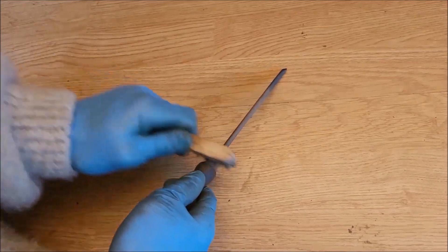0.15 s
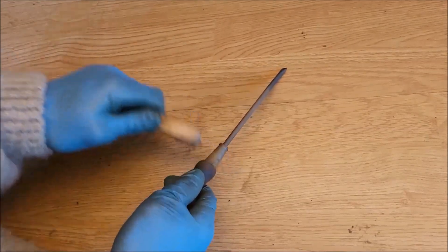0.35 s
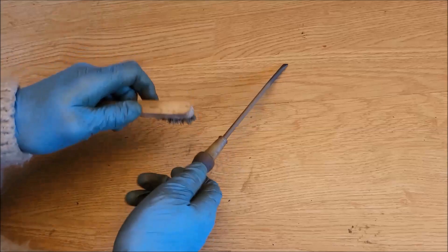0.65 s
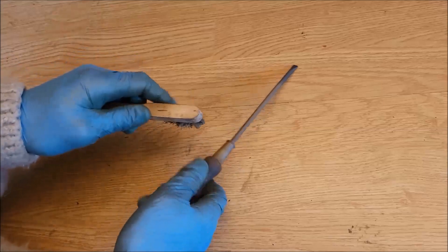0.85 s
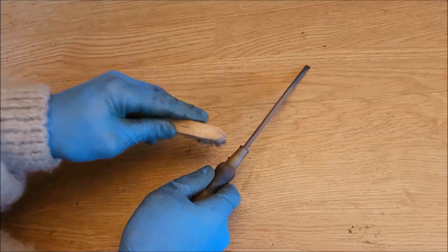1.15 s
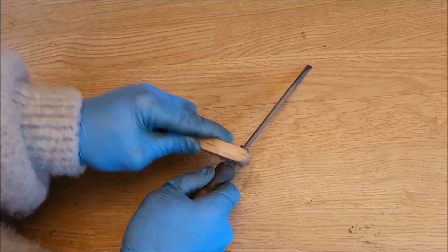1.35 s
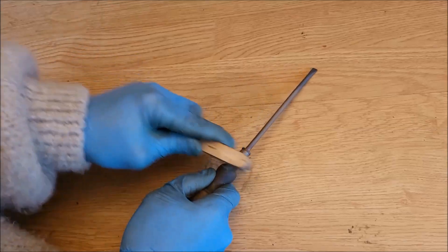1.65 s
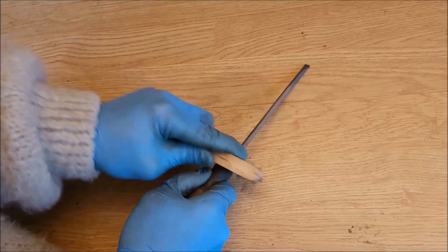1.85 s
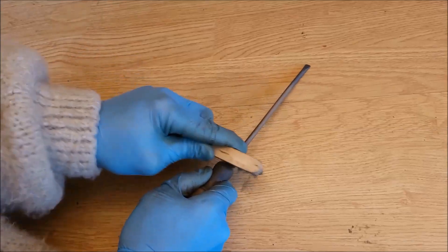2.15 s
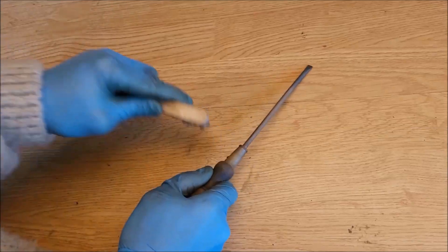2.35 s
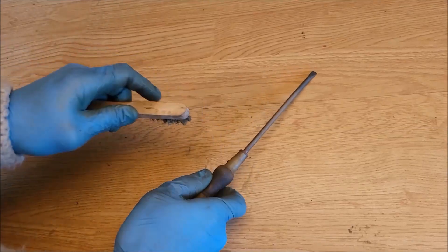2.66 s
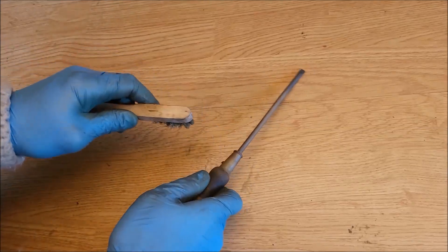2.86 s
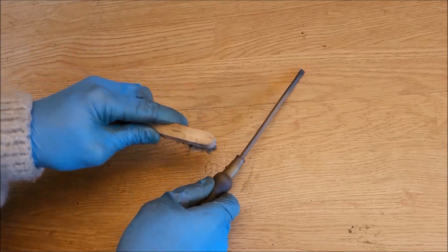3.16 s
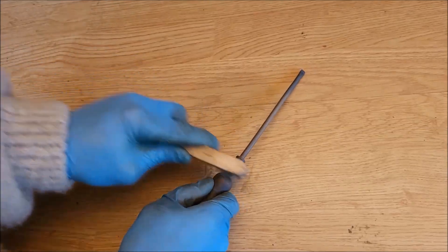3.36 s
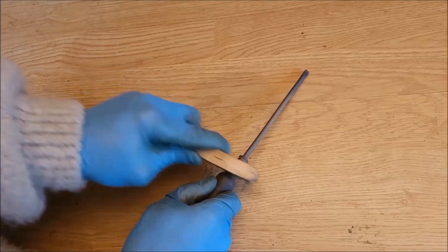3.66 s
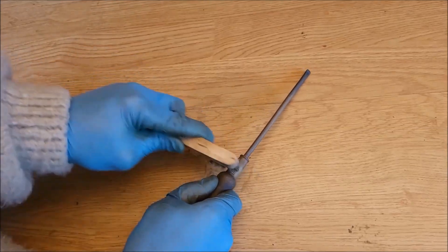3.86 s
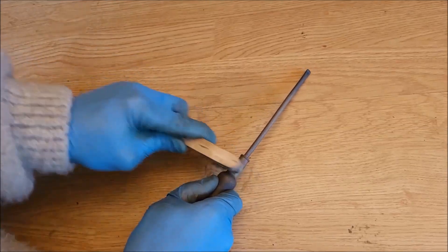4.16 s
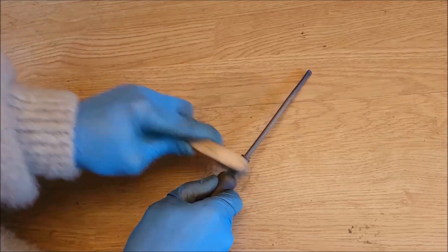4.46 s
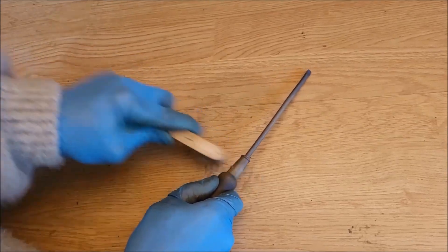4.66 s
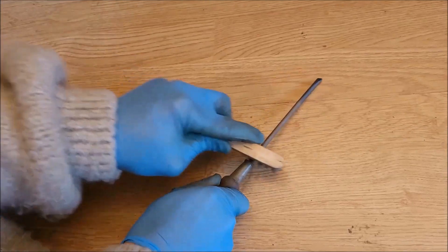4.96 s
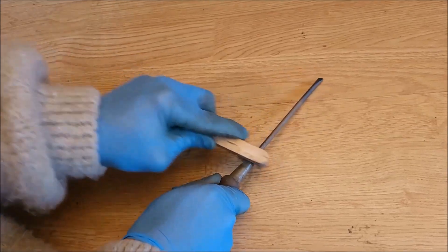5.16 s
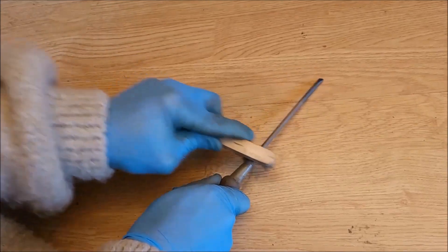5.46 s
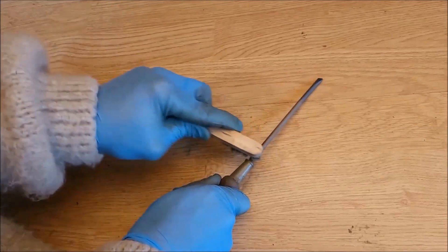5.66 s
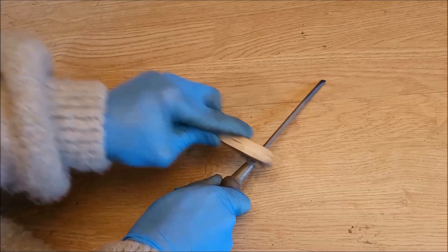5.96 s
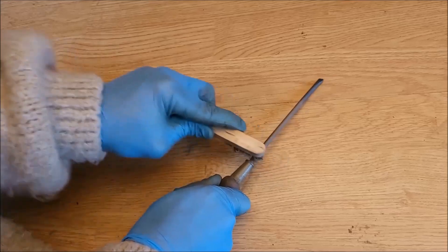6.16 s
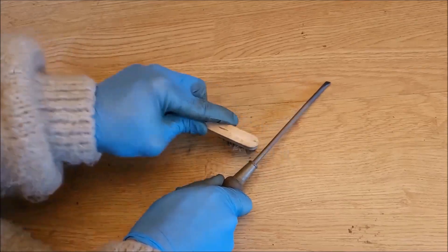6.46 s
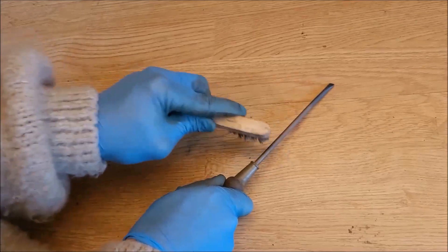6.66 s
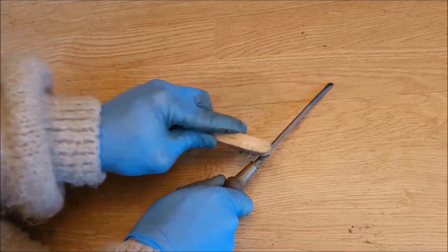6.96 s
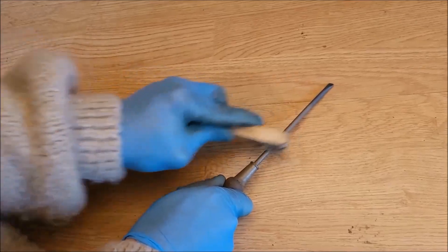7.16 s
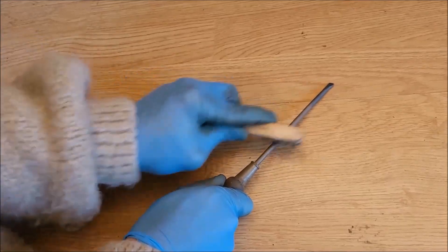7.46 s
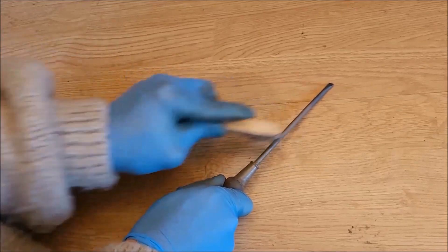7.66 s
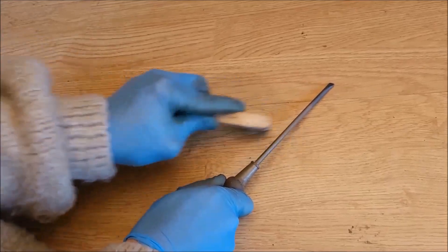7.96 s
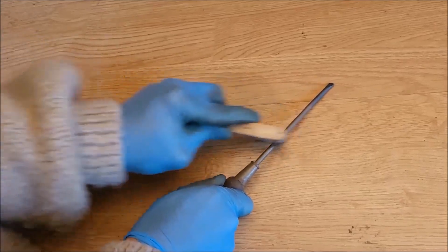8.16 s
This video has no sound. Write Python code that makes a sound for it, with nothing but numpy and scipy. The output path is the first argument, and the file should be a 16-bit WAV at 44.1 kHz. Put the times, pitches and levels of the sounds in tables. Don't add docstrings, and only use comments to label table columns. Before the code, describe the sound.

Close, dry scrubbing of wire bristles on rusty metal, the wooden table thudding underneath, with two pauses, a loud clack, then slower scrubs.

```python
import sys
import numpy as np
from scipy import signal
from scipy.fft import irfft
from scipy.io import wavfile
from scipy.ndimage import uniform_filter1d

SR = 44100
rng = np.random.default_rng(int(sys.argv[2]) if len(sys.argv) > 2 else 0)


def int16_out(signal):
    q = np.round(np.clip(np.atleast_2d(signal).T, -1, 1) * 32767)
    wavfile.write(sys.argv[1], SR, q.astype(np.int16))


def elevation(decibels):
    levels = np.asarray(decibels, float)
    return 10 ** (levels / 20)


N = 366471
T = np.arange(N) / SR
SIZE, LEAD = 16384, 256
HZ = np.fft.rfftfreq(SIZE, 1 / SR)

# (frequency [Hz], width [Hz], level [dB])
TOP_MODES = [(140.9, 25.8, -6.5), (233, 22.2, 2), (272, 37.5, 0.5), (336.2, 42.4, -1.5), (365.7, 74, -11.5),
             (418.4, 39, -16), (474.5, 36, -19)]
# (frequency [Hz], width [Hz], level [dB])
CLACK_MODES = [(1840, 490, -2.5), (875, 49, 5.5), (1120, 81, 0), (1940, 130, 4.5), (3600, 100, -15.5),
               (5130, 980, -30), (1460, 490, -14)]
# (frequency [Hz], density [dB per Hz])
WIRE_SPECTRUM = [(710, -21), (1200, -22), (1370, -5.5), (1660, -5.5), (1990, -14), (2670, -9), (4820, -5),
                 (7750, -5.5), (8730, -9.5), (14700, -1), (15800, -7.5)]


def evened(x):
    return x / np.sqrt(np.mean(x ** 2) + 1e-20)


def drift(span_s):
    span = max(round(span_s * SR), 2)
    once = uniform_filter1d(rng.standard_normal(N), span)
    return evened(uniform_filter1d(once, span))


def read(points, hz):
    f, value = np.transpose(points)
    return np.interp(np.log(hz + 1), np.log(f + 1), value)


def body(modes, order=2):
    total = 0
    for f, width, db in modes:
        damping = 1j * width * HZ
        total = total + elevation(db) * (damping / (f ** 2 - HZ ** 2 + damping)) ** order
    return total


def mean_gain(response):
    return np.sqrt(np.mean(abs(response) ** 2))


def unit(response):
    return response / mean_gain(response)


def through(x, response):
    taps = np.roll(irfft(response), LEAD)
    return signal.oaconvolve(np.atleast_2d(x), taps[None], axes=1)[:, LEAD:LEAD + N]


def friction(per_s, spread_db, judder_db, judder_s, same, level_db):
    slips = rng.standard_normal((2, N))
    chance = rng.random((2, N)) * SR / per_s
    slips *= (chance < 1) * np.maximum(chance, 0.005) ** (-spread_db / 9.4)
    judder = elevation(judder_db * drift(judder_s))
    force = judder / np.sqrt(np.mean(judder ** 2))
    a, b = evened(slips) * force * elevation(level_db)
    turn = np.arccos(same) / 2
    return np.array([np.cos(turn) * a + np.sin(turn) * b, np.cos(turn) * a - np.sin(turn) * b])


def blows(rows, share_db, soft_s):
    x, rows = np.zeros(N), np.array(rows)
    x[(rows[:, 0] * SR).astype(int)] = elevation(rows[:, 1] + share_db)
    push = np.hanning(max(round(soft_s * SR), 1) + 2)
    return np.convolve(x, push / push.sum())[:N]


def struck(x, modes):
    response = body(modes, order=1)
    return through(x, response / abs(irfft(response)).max())


def sliding():
    # (start [s], end [s])
    turns = [
        (.47, 1.2),
        (2.52, 3.45),
    ]
    lifted = sum((T > start) * (T < end) * 0.98 for start, end in turns)
    return uniform_filter1d(lifted, size=1500)


def swells(rows, db, lag_s=0, stretch=1, hurry=1, square=2):
    flank_db = 43
    t = T[::64, None]
    away = (t - rows[:, 0] - lag_s) / (rows[:, 1] * stretch)
    away = np.where(away > 0, away * hurry, -away)
    loss_db = flank_db * ((1 + away ** square) ** (1 / square) - 1)
    power = (elevation(db - loss_db) ** 2).sum(1)
    return np.interp(T, t[:, 0], power)


def effort(layer):
    # (middle [s], half length [s], wire hiss [dB], shaft ring [dB],
    # table top [dB])
    strokes = [(-0.03, 0.056, -54.5, -51, -43.5), (0.127, 0.067, -53.5, -55.5, -47.5),
               (0.271, 0.062, -54.5, -53, -49), (0.407, 0.054, -51.5, -55, -47), (1.386, 0.041, -65, -70, -56),
               (1.509, 0.061, -60, -59, -45.5), (1.664, 0.073, -58.5, -57.5, -46),
               (1.807, 0.075, -56.5, -51.5, -49.5), (1.937, 0.06, -57, -56.5, -49),
               (2.086, 0.067, -52, -49, -46.5), (2.221, 0.06, -59, -56, -51), (2.37, 0.091, -54, -49, -48.5),
               (3.516, 0.055, -66.5, -59.5, -54), (3.628, 0.058, -59, -57, -48.5),
            (3.769, 0.058, -57.5, -54.5, -48), (3.911, 0.059, -57, -55.5, -44.5),
            (4.046, 0.064, -54, -51.5, -44), (4.194, 0.059, -56.5, -53, -46),
            (4.328, 0.052, -53, -47.5, -42), (4.467, 0.061, -53.5, -53, -43), (4.6, 0.063, -54, -50.5, -51),
            (4.737, 0.056, -51, -49, -41.5),
               (4.948, 0.061, -51.5, -44, -41), (5.091, 0.07, -64.5, -65, -54.5),
             (5.226, 0.058, -56.5, -55, -45), (5.354, 0.077, -61.5, -59.5, -62),
             (5.48, 0.054, -56.5, -53, -46), (5.626, 0.058, -57, -53, -44),
             (5.738, 0.072, -55, -53.5, -45.5), (5.873, 0.057, -56, -53, -43.5),
             (5.998, 0.076, -56.5, -54, -45.5), (6.135, 0.062, -58.5, -60, -45),
             (6.274, 0.065, -56, -51.5, -40.5), (6.405, 0.081, -60, -58.5, -48.5),
             (6.557, 0.073, -56.5, -59.5, -44),
               (7.041, 0.057, -57.5, -56, -45), (7.186, 0.073, -58, -51.5, -42),
            (7.333, 0.081, -52.5, -50.5, -41.5), (7.667, 0.078, -50.5, -47, -43),
            (7.986, 0.066, -50, -47, -40.5), (8.292, 0.042, -52.5, -48.5, -42)]
    slides = [(0.495, 0.074, -99, -65, -58.5), (0.588, 0.084, -78, -69.5, -59),
              (0.913, 0.065, -69.5, -47, -51), (1.036, 0.1, -69, -43, -45), (1.156, 0.074, -76, -48, -45.5),
              (2.588, 0.063, -99, -51, -51.5), (2.7, 0.14, -85, -70.5, -58.5),
              (2.812, 0.045, -88, -84, -54), (0.777, 0.26, -84, -99, -99), (2.94, 0.077, -73.5, -47, -50),
              (3.114, 0.064, -99, -94.5, -63.5), (3.175, 0.025, -99, -75.5, -81),
              (3.25, 0.046, -99, -82, -66), (6.725, 0.022, -53.5, -41.5, -58)]
    # (middle [s], half length [s], shaft ring [dB], table top [dB])
    bites = np.array([(0.29, 0.022, -54.5, -47), (0.44, 0.015, -76, -48), (1.087, 0.016, -45.5, -56),
                      (1.435, 0.0097, -59, -72), (1.678, 0.035, -44, -62), (1.832, 0.034, -43, -71),
                      (1.965, 0.015, -72, -49), (2.076, 0.017, -44, -41), (2.228, 0.016, -46, -48),
                      (2.376, 0.032, -76, -38), (2.402, 0.014, -38, -61), (3.528, 0.011, -53.5, -63),
                      (3.61, 0.0074, -66, -52), (4.756, 0.0092, -63, -55), (4.943, 0.028, -35.5, -54),
                      (5.339, 0.019, -73, -43.5), (5.747, 0.035, -47.5, -42), (5.896, 0.011, -42.5, -61),
                      (6.155, 0.037, -51.5, -66), (6.274, 0.013, -48, -57), (6.406, 0.023, -58, -48),
                      (6.656, 0.016, -39.5, -54), (7.38, 0.0082, -70, -48), (7.584, 0.01, -71, -41),
                      (8.02, 0.013, -58, -40.5), (8.241, 0.014, -75, -46)])
    # (time [s], t60 [s], hiss [dB], ring [dB], table top [dB])
    landings = [
        (3.465, 0.75, -71.5, -74, -52.5),
        (6.643, 0.3, -59, -40.5, -34.5),
        (6.919, 0.19, -67.5, -69.5, -53.5),
        (7.573, 0.1, -64, -64, -38),
        (7.882, 0.93, -70.5, -81, -51),
        (8.227, 0.12, -73, -72, -36),
    ]
    grabs = [(0.361, 0.25, -66, -52, -46), (0.991, 0.15, -74, -54, -54), (1.357, 0.15, -69, -67.5, -46.5),
             (1.428, 0.09, -76, -60, -72), (2.024, .25, -65, -77, -51), (2.213, 0.18, -76, -48, -61),
             (2.318, 0.3, -50.5, -68, -46.5), (2.698, 0.31, -72, -70, -70), (4.295, 0.27, -57.5, -63, -44),
             (4.448, 0.13, -61, -53, -54), (4.568, 0.18, -53, -52, -38.5), (4.701, 0.31, -68, -51.5, -46),
             (5.334, 0.48, -62, -61, -48.5), (5.605, .3, -72, -50.5, -55), (5.72, 0.25, -69, -51, -58),
             (6.263, 0.16, -68, -45, -55), (6.398, 0.23, -73, -46.5, -50), (6.982, 0.4, -65.5, -78, -44),
             (7.14, 0.27, -56.5, -74, -44)]
    lag_s = (0, 0.004, 0.0006)[layer]
    stretch = (0.85, 0.87, 0.94)[layer]
    hurry = (0.98, 0.95, 1)[layer]
    square = (2.32, 2.195, 2.4)[layer]
    rows = np.vstack([strokes, slides])
    power = swells(rows, rows[:, 2 + layer], lag_s, stretch, hurry, square)
    if layer:
        power = power + swells(bites, bites[:, 1 + layer])
    for s, t60, *db in landings + grabs:
        at = round(s * SR)
        decay_db = 60 * T[:min(SR, N - at)] / t60
        power[at:][:SR] += elevation(db[layer] - decay_db) ** 2
    return 10 * np.log10(power + 1e-13)


def air():
    # (frequency [Hz], density [dB per Hz])
    room = [(18, -47), (30, -3), (145, -1), (203, -18.5), (271, 0), (326, -11), (500, -20), (795, -21.5),
            (3830, -27), (4980, -25.5), (7780, -22.5), (15800, -26)]
    a, b = rng.standard_normal((2, N))
    ports = np.array([a, 0.09 * a + 1.1 * b])
    level_db = -74 - 4 * (T > 3.1) * (T < 4)
    return elevation(level_db) * evened(through(ports, elevation(read(room, HZ))))


def wires():
    drive = friction(20000, 0.78, 2.15, 0.007, 0.029, effort(layer=0) + 5.14)
    return through(drive, unit(elevation(read(WIRE_SPECTRUM, HZ)))) * elevation([[1.2], [-1.2]])


def shaft():
    # (frequency [Hz], width [Hz], level [dB]), brush near the hand
    near_modes = [(660, 53, -4.5), (792, 24, -9.5), (876.6, 134, -2), (935.5, 93, -0.5),
                  (1023.5, 175, -1.5), (1155, 59, -21.5), (1530, 400, -14), (1757, 100, -9),
                  (1957, 100, -5.5), (2130, 85, -6), (2310, 230, -15)]
    far_modes = [(1080, 170, -1.5), (1600, 850, -3), (1930, 87, 3.5), (2183, 280, 0.5), (2776, 470, -5),
                 (3430, 380, -7)]
    tip_modes = [(654, 38, -2.5), (720, 127, -1.5), (826, 96, 0), (1737, 120, -1.5), (974, 140, -6),
                 (1526, 99, 3.5), (1942, 110, -4), (2090, 295, -7.5)]
    grit_modes = [(2890, 300, 1), (3277, 440, 5.5), (4040, 280, -2.5), (4530, 1640, -1), (6920, 990, -7)]
    # (time [s], reach [0-1])
    reach_points = [(0, 0.4), (1.3, 0), (1.65, 0.74), (2.5, 0.86), (3.4, 0), (4.8, 0), (5.1, 0.35),
                    (6.6, 0.85), (6.9, 0.94), (7.5, 0.96), (7.9, 0.88), (8.31, 0.88)]
    # (time [s], peak [dB])
    catches = [(0.859, -64), (0.991, -24.5), (1.358, -58), (1.432, -44), (2.025, -53), (2.213, -32.5),
               (2.9, -31), (4.296, -39), (4.566, -45), (4.703, -49), (4.923, -27), (6.266, -34), (6.4, -24),
               (6.72, -25.5), (6.985, -67), (7.139, -60.5)]
    ring_db, tip = effort(layer=1) + 0.27, sliding()
    reach = np.interp(T, *np.transpose(reach_points))
    drive = friction(7000, 1.6, 1.6, 0.006, 0.7, ring_db - 0.4)

    slid, whole = drive * np.sqrt(tip), mean_gain(body(tip_modes))
    middle_db = -0.2 * (ring_db + 50) + 4.3 * drift(0.05)
    out = through(slid * elevation(middle_db), body(tip_modes[1:3]) / whole)
    outer_db = 0.37 * (ring_db + 47.5) + 0.92 * drift(0.063)
    outer = tip_modes[:1] + tip_modes[4:5] + tip_modes[6:]
    out += through(slid * elevation(outer_db), body(outer) / whole)
    out += through(slid * elevation(0.25 * (ring_db + 49)), body(tip_modes[3:4]) / whole)
    out += through(slid * elevation(-0.05 * (ring_db + 47) - 3.5), body(tip_modes[5:6]) / whole)

    brushed, whole = drive * np.sqrt(1 - tip), mean_gain(body(far_modes))
    for modes, power in ((far_modes[:2], 4), (far_modes[2:4], 2), (far_modes[4:], 2)):
        level_db = 1.2 * drift(0.072) - 1 + (power > 2) * 4.5 * (T > 7.5)
        out += through(brushed * reach ** power * elevation(level_db), body(modes) / whole)

    near, whole = brushed * np.sqrt(1 - reach ** 4), mean_gain(body(near_modes))
    for k in range(3):
        out += through(near * elevation(1.4 * drift(0.035) - 0.3), body(near_modes[k::3]) / whole)

    grit_db = ring_db - 8 + (0.48 + 0.5 * tip) * (np.minimum(ring_db, -45) + 51.5) - 5.8 * tip
    grit = friction(3500, 1.3, 2.6, 0.012, 0.03, grit_db)
    return out + through(grit, unit(body(grit_modes))) + struck(blows(catches, -2, 0.0003), CLACK_MODES)


def table():
    # (frequency [Hz], width [Hz], level [dB])
    thud_modes = [(60.1, 33, 1), (52.7, 16, -6), (81.5, 34, -6)]
    # (time [s], level [dB])
    lean = [(0, -0.5), (1.35, -1), (1.45, -8), (2.0, 0), (3.5, 1.5), (5.2, 1), (6.6, 1), (6.7, 1),
            (8.31, 4)]
    drive = friction(3000, 1.6, 2.2, 0.012, 0.96, effort(layer=2) - 1.5)
    whole = mean_gain(body(TOP_MODES))
    upper_db = -9 * sliding() + 1.7 * drift(0.041) - 2.5
    top = through(drive * elevation(upper_db), body(TOP_MODES[3:]) / whole)
    sway = elevation(2 * drift(0.043))
    top += through(drive * sway, body(TOP_MODES[1:2]) / whole)
    top += through(drive / sway, body(TOP_MODES[2:3]) / whole)
    deepest = body(TOP_MODES[:1])
    deep = elevation(-2) / whole + elevation(2.5 * drift(0.016) - 23) / mean_gain(deepest)
    leaned = drive * deep * elevation(np.interp(T, *np.transpose(lean)))
    top -= through(leaned, deepest)
    thud = through(friction(800, 0.5, 0.98, 0.017, 0.86, hands() + 0.21), unit(body(thud_modes)))
    return top + thud + thumps()


def hands():
    # (middle [s], half length [s], thud [dB])
    shoves = np.array([(1.12, 0.06, -46.5), (1.27, 0.092, -51), (1.419, 0.049, -61.5), (2.433, 0.12, -51),
                       (4.327, 0.095, -63), (4.79, 0.093, -56), (6.29, 0.05, -66), (6.69, 0.2, -60.5),
                       (7.41, 0.13, -61.5), (7.645, 0.061, -53), (7.74, 0.054, -55), (7.923, 0.051, -54.5),
                       (8.05, 0.13, -54.5), (8.28, 0.049, -49)])
    rest_db, rock_db, rock_share = -86, -71.5, 0.89
    rocked = elevation(rock_db + rock_share * (effort(layer=2) + 47.5)) ** 2
    shoved = swells(shoves, shoves[:, 2])
    return 10 * np.log10(elevation(rest_db) ** 2 + uniform_filter1d(rocked, size=3000) + shoved)


def echo(x):
    # (frequency [Hz], t60 [s])
    decay = [(150, 0.22), (700, 0.041), (2000, 0.23), (6000, 0.34), (14000, 0.17)]
    hz, t, z = signal.stft(rng.standard_normal((3, 2, SR // 4)), SR, nperseg=256)
    tails = signal.istft(z * elevation(-60 * t / read(decay, hz)[:, None]), SR, nperseg=256)[1]
    tails[..., :130] = 0
    out = 0
    for k, tail in enumerate(tails):
        turn = np.sqrt(2 / 3) * np.cos(2 * np.pi * (2.3 * T + k / 3))
        out = out + signal.oaconvolve(x * turn, tail / np.linalg.norm(tail[0]), axes=1)[:, :N]
    return out


def thumps():
    # (time [s], peak [dB], pitch [Hz])
    jolts = [(0.272, -40, 276), (0.303, -36, 282), (0.367, -46, 295), (0.438, -35.5, 239),
             (1.079, -33, 232), (1.62, -41.5, 285), (1.77, -38, 272), (2.071, -35, 269),
             (2.302, -45.5, 295), (2.375, -29, 272), (3.464, -53, 238), (3.618, -37.5, 272),
             (3.741, -41, 233), (3.873, -49, 265), (3.912, -41, 230), (4.208, -36, 231), (4.291, -36, 272),
             (4.452, -43, 270), (4.487, -32.5, 232), (4.571, -31, 279), (4.602, -34.5, 320),
             (4.704, -34.5, 278), (4.744, -32.5, 255.5), (4.884, -43, 246), (4.909, -34.5, 245),
             (4.957, -35, 271), (5.335, -39, 359), (5.448, -39, 274), (5.591, -44, 274), (5.7, -36, 255),
             (5.735, -36.5, 238), (5.843, -34, 284), (5.967, -40, 369), (6.235, -37, 272),
             (6.354, -37, 272), (6.418, -35, 238), (6.647, -25, 235), (6.915, -46.5, 286),
             (6.999, -42, 245), (7.142, -42.5, 225), (7.319, -37, 275), (7.346, -29, 245.5),
             (7.396, -34, 228.3), (7.575, -29, 238), (7.685, -36, 226), (7.887, -47, 264),
             (8.009, -31, 257), (8.031, -31, 280)]
    deep_jolts = [(2.37, -44, 135), (4.744, -35, 145.7), (6.65, -29, 137), (6.664, -31.5, 136),
                  (7.578, -31, 135), (7.594, -34, 135), (7.701, -39, 130.6), (8.232, -36, 139),
                  (8.246, -34, 136)]
    rise_s, t60_s = 0.00481, 0.12
    out, t = np.zeros(N + SR), np.arange(SR // 5) / SR
    shape = (1 - np.exp(-t / rise_s)) * elevation(0.9 - 60 * t / t60_s)
    for s, db, hz in jolts + deep_jolts:
        at = round((s - rise_s) * SR)
        out[at:at + len(t)] += elevation(db) * shape * np.sin(2 * np.pi * hz * t)
    return out[:N]


def damped(x):
    # (time [s], grip [0-1])
    grip_points = [(0, 0.25), (1.4, 0), (1.7, 0.12), (2.5, 0.06), (3.4, 0), (4.9, 0.2), (5.4, 0.97),
                   (6.5, 0.5), (6.7, .2), (7.1, 0.63), (7.5, 0.28), (7.9, 0), (8.31, 0)]
    gripped, node = [(1470, 690, 0.015)], [(1300, 240, 0.0077)]  # Hz, width Hz, dB
    slide = sliding()
    grip = np.interp(T, *np.transpose(grip_points)) * (1 - slide)
    x = x - through(x * grip, body(gripped, order=1))
    return x - through(x * 0.88 * slide, body(node, order=1))


def sings():
    # (middle [s], half length [s], pitch [Hz], glide [Hz per s], level [dB])
    drag_sings = [(.5, .05, 832, 0, -67), (.59, 0.056, 828, 0, -59), (0.578, 0.051, 1634, -500, -74),
                  (0.929, 0.064, 639, -12, -54.5), (1.058, 0.036, 634, 0, -52),
                  (1.17, 0.037, 864, 500, -50.5), (1.25, .04, 920, 500, -72), (1.18, 0.045, 1747, 600, -44),
                  (1.274, 0.067, 1780, 0, -75), (1.087, 0.033, 1955, 0, -49), (1.453, .04, 1936, 0, -60),
                  (1.523, 0.041, 1980, 0, -73), (2.087, 0.016, 2010, 0, -48), (2.36, .03, 1070, 0, -51),
                  (2.409, 0.016, 1930, 0, -39.5), (2.592, 0.033, 1604, 0, -59),
                  (2.598, 0.027, 2950, 0, -62.5), (2.68, .1, 864, 0, -69), (2.754, 0.036, 1700, 5, -77),
                  (2.932, 0.12, 650, 0, -52), (2.963, 0.045, 1497, 0, -55), (2.956, 0.024, 2940, 0, -53.5),
                  (2.968, 0.018, 2050, 0, -56), (3.185, 0.027, 800, -2, -72.5), (3.26, 0.05, 855, 299, -79),
                  (5.766, 0.014, 1020, 0, -64), (5.998, 0.024, 907, 0, -55), (6.276, 0.011, 886, 0, -39.5),
                  (6.414, 0.021, 1900, 0, -48), (6.407, .02, 950, 0, -47), (7.053, 0.015, 2080, 0, -60),
                  (7.2, .015, 2270, 0, -55), (7.333, .06, 2030, 0, -58), (7.645, 0.057, 1067, 0, -58.5),
                  (7.681, 0.07, 1940, 0, -57), (7.969, 0.072, 1103, 1502, -54),
                  (8.0, 0.057, 1940, 0, -54.5), (8.286, .03, 1057, 0, -51.5)]
    knock_sings = [(6.662, 0.02, 1013, 0, -47.5), (6.722, 0.0087, 930, 0.0056, -36),
                   (6.722, .01, 2000, 0, -43), (6.725, 0.011, 3320, 0.003, -45.5)]
    width, flank_db = 0.052, 14
    count = 9000
    t = (np.arange(count) - count // 2) / SR
    out = np.zeros((2, N + SR))
    for s, half, hz, glide, db in drag_sings + knock_sings:
        noise, at = rng.standard_normal((3, count)), round(s * SR) - count // 2
        turn = np.exp(2j * np.pi * (hz * t + glide * t ** 2 / 2))
        r = np.exp(-np.pi * width * hz / SR)
        ports = noise[0] + 0.84 * noise[1:]
        slow = signal.lfilter([1], np.convolve([1, -r], [1, -r]), ports / turn)
        level = elevation(db - flank_db * (t / half) ** 2)
        out[:, at:at + count] += level * evened((turn * slow).real) * np.hanning(count)
    return out[:, :N]


def knocks():
    # (time [s], peak [dB], table top share [dB], wire tick share [dB])
    hits = np.array([
        (3.463, -59, 20, -7),
        (6.643, -15, -21, -17),
        (6.915, -61, 19, -12),
        (7.575, -48.5, 16.5, 3),
        (7.885, -57, 18, 1),
        (8.226, -51, 25, -2),
    ])
    steel = struck(blows(hits + [0.0008, 0, 0, 0], -1, 0.0003), CLACK_MODES)
    push = blows(hits, hits[:, 2] - 2.5, 0.0045)
    wood = struck(push, TOP_MODES) + elevation(-3) * struck(push, TOP_MODES[:1])
    click = blows(hits, hits[:, 3] + 3.3, 0.00002)
    tick = through(click, unit(elevation(read(WIRE_SPECTRUM, HZ))))
    return steel + wood + tick


def scene():
    bright = damped(wires() + shaft()) + sings()
    hits = knocks()
    reflected = echo(elevation(-5.5) * (bright + hits))
    return bright + hits + table() + reflected + air()


def top_cut(x):
    return signal.sosfilt(signal.butter(12, 15830, fs=SR, output="sos"), x)


def record(dry):
    # (out [s], in [s])
    cuts = [
        (4.834, 4.866),
        (6.634, 6.641),
    ]
    gain = np.ones(N)
    for a, b in cuts:
        gain *= np.interp(T, [a, a + 0.0046, b - 0.004, b], [0.95, 0.034, 0.04, 0.94])
    edge_hz, slope_hz = 15790, 30
    limit = 1 / (1 + np.exp(np.clip((HZ - edge_hz) / slope_hz, -50, 50)))
    return top_cut(through(dry * gain, limit))


dry = scene()
out = record(dry)
int16_out(out)
```